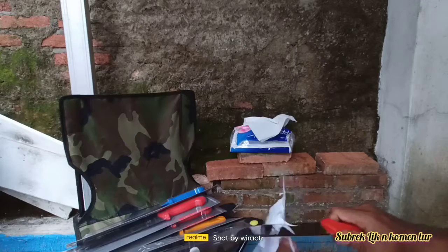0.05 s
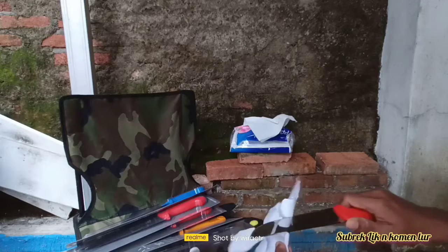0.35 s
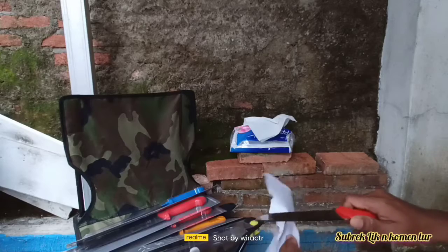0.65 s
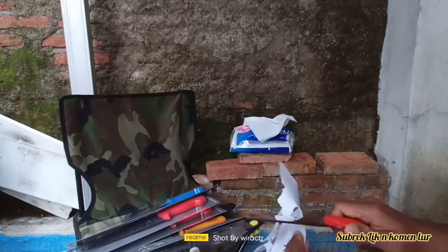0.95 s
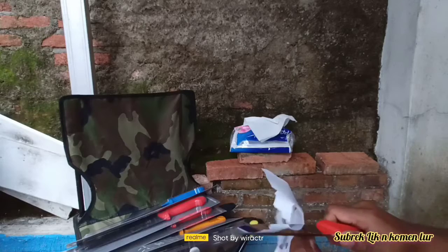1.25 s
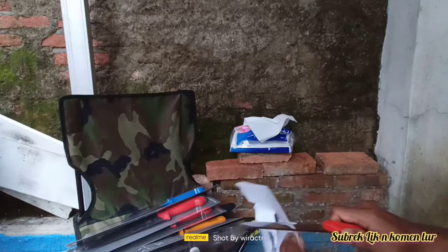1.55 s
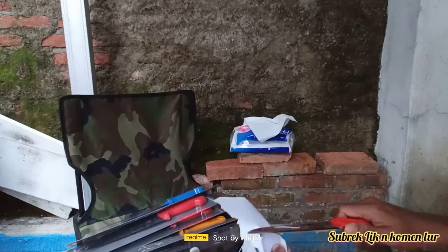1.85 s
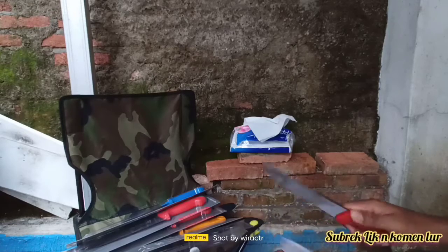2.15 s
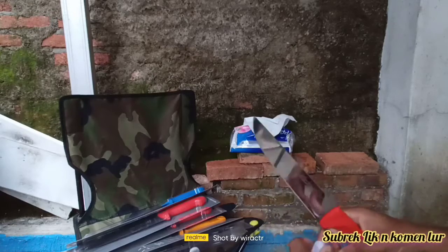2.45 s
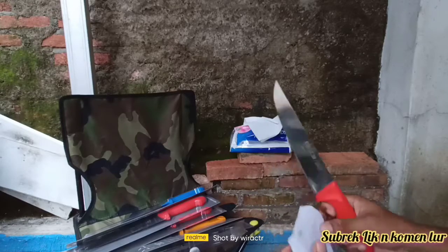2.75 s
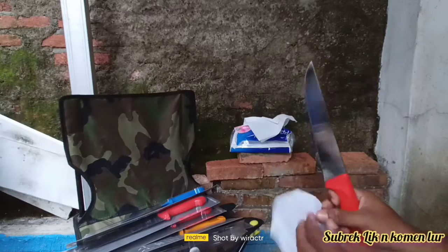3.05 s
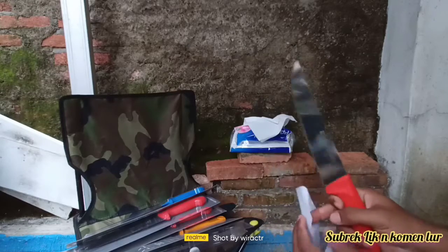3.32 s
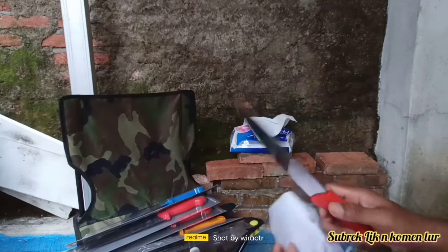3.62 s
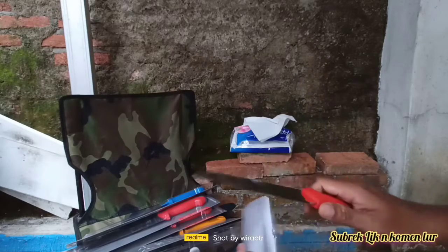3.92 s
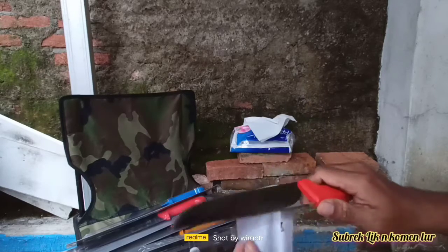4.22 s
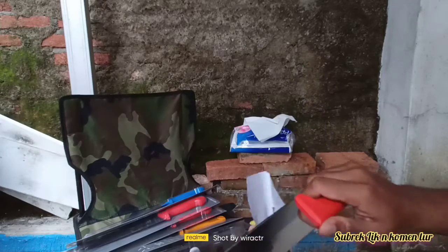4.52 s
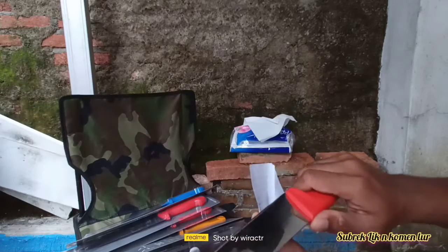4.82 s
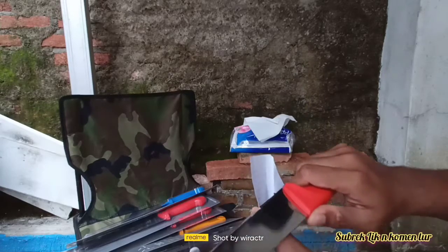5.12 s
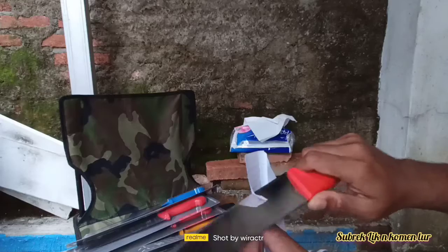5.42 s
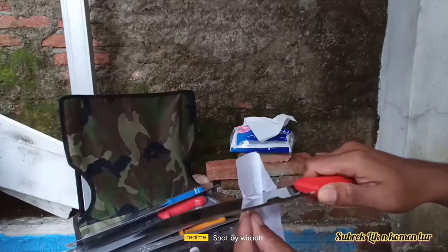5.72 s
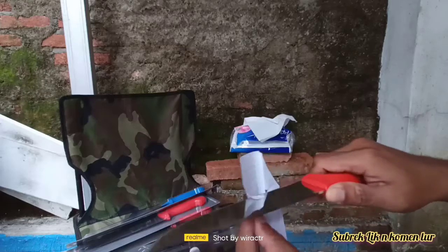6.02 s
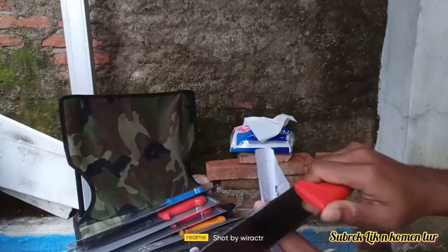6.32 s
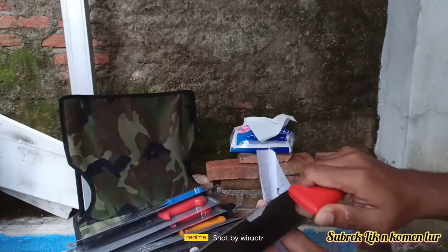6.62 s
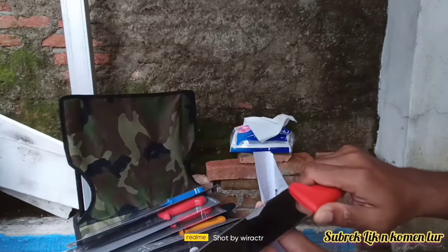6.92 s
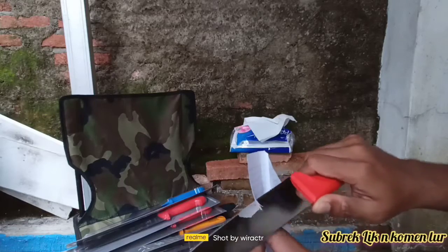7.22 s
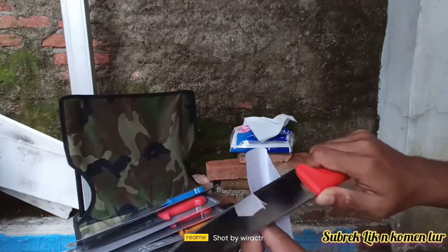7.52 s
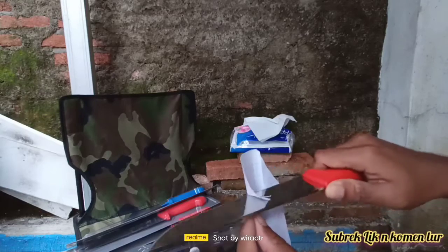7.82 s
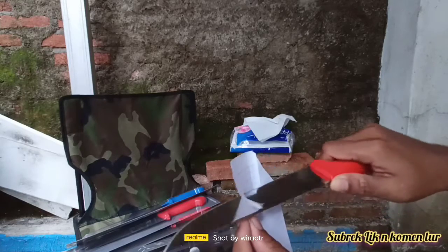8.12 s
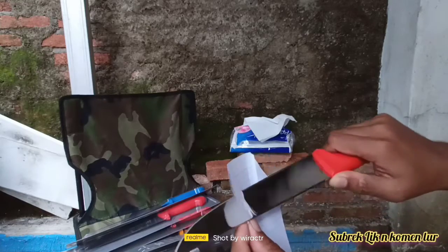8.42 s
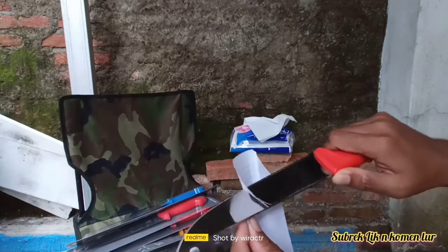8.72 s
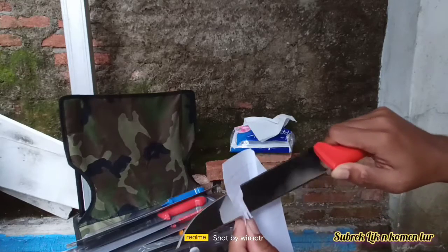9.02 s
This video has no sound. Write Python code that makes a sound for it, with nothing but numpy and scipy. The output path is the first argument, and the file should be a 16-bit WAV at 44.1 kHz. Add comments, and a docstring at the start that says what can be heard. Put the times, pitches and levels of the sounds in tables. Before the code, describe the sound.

In a quiet corner with a short echo from nearby walls, a knife rips twice through tissue paper at close range. Light rustles and crisp little crackles follow as fingers shift the sheet. Then come two runs of slower slicing strokes, thin, hissy and faintly ringing. A distant motorbike idles softly underneath, growing a little louder and speeding up near the end.

```python
"""Two quick cuts rip through a hand-held paper tissue, close by, in a quiet walled corner.
A sharp knife snaps the fibres, which hiss and shake the sheet. The tissue is picked up again with
small crinkles, then the blade is drawn through it in slow strokes that set paper and steel ringing.
Far off a motorbike idles and pulls away, its firings humming through the exhaust.
A noise suppressor holds the bass down, but lets that hum well up under the loud strokes."""
import sys
import numpy as np
from scipy import signal
from scipy.fft import rfft, irfft
from scipy.io import wavfile
from scipy.ndimage import uniform_filter1d

SR = 44100
rng = np.random.default_rng(int(sys.argv[2]) if len(sys.argv) > 2 else 0)


def store_wav(level_fs):
    """Save 16-bit WAV to argv[1]."""
    pcm = np.round(np.clip(np.atleast_2d(level_fs), -1, 1) * 32767)
    wavfile.write(sys.argv[1], SR, pcm.T.astype(np.int16))


N = 403515
TIME = np.arange(N) / SR
CUTOFF_HZ = 15700

# Levels in the tables are relative: the functions add their own gains.
# tone colour of still air: f/Hz, level/dB
AIR_COLOUR = [(18, -23.5), (30, -24), (75, 0.5), (148, 1), (202, -7.5), (341, -6.5), (467, -16), (591, -19),
              (656, -17.5), (1330, -28.5), (1640, -29), (2360, -31.5), (4910, -28), (9940, -50),
              (15500, -43)]
# faint tones: start/s, length/s, first f/Hz, last f/Hz, width/Hz, level/dB
TONE_SWELLS = [(0.548, 0.23, 1710, 1710, 170, -74.5), (1.838, 0.26, 710, 690, 52, -78),
               (3.822, 0.24, 175, 144, 14, -60), (4.552, 0.19, 4050, 4280, 300, -85),
               (5.837, 0.196, 4900, 5100, 330, -77), (7.552, 0.24, 147, 144.5, 18, -56)]
# the engine idles, then pulls away: t/s, firing rate/Hz, level/dB, boom/dB
ENGINE_RUN = [(0, 31.2, -65.5, -67), (1.1, 29, -62, -60.5), (1.6, 30, -60.5, -63), (2.1, 28, -65.5, -67.5),
              (2.6, 27.4, -66, -54.5), (3.25, 30.5, -62.5, -72), (3.6, 32.6, -62, -74),
              (3.95, 29, -60, -68), (5.0, 30, -71, -78), (5.55, 27.5, -61, -47.5), (5.85, 29.5, -49, -44),
              (6.14, 28.4, -59.5, -58), (6.45, 29, -57, -49.5), (7.15, 30, -61, -62),
              (7.6, 34, -58.5, -57.5), (7.92, 34, -55.5, -55), (8.28, 38.1, -52.5, -54),
              (9.15, 38.7, -53, -76)]
# tone colour of the exhaust pipe: f/Hz, level/dB
EXHAUST_COLOUR = [(28, -19.5), (45, -12.5), (60, 3), (76, 1.5), (95, -6.5), (115, -1), (150, -4.5),
                  (190, 1.5), (260, -6.5), (370, -5.5), (470, -14.5), (600, -16.5), (750, -26.5),
                  (1500, -30.5), (3500, -43)]
# the engine's 16th harmonic sings under load: t/s, level/dB
ENGINE_WHINE = [(7.9, -75), (8.2, -66.5), (8.55, -69.5), (8.84, -52.5), (8.93, -68)]
# fingers bump the handle: t/s, level/dB, f/Hz, t60/s (time to fade by 60 dB)
FINGER_BUMPS = [(0.326, -59, 370, 0.1), (1.789, -47, 143, 0.16), (3.1, -52, 377, 0.16),
                (3.211, -56, 366, 0.09), (3.238, -63, 250, 0.1), (3.566, -53.5, 384, 0.15),
                (6.466, -58, 343, 0.26)]
# tone colours of the fibres' hiss when rustled, slowly sliced and quickly cut: f/Hz, level/dB
RUSTLE_HISS = [(1200, -17), (2300, -24), (3300, -6), (5200, -1.5), (6200, -5), (7400, 1.5), (8300, -1.5),
               (9800, -10.5), (12000, -11), (14600, -4.5), (15500, -3.5)]
DRAW_HISS = [(1200, -18), (2200, -4), (3000, 1.5), (4200, 0), (4500, -2), (5200, 0), (6400, -2),
             (7700, 4.5), (8500, 0.5), (9800, -6), (12000, -6.5), (14000, -1.5), (15500, 0)]
CUT_HISS = [(1200, -48), (2200, -20), (3100, -5), (4200, -7.5), (4900, -3), (5600, -7), (7300, -1),
            (8100, -3), (8650, -6.5), (9600, -7.5), (11300, -11), (13000, -4.5), (14900, 1), (15600, -4.5)]
# tone colours of the "body", the whole sheet shaking, loose and taut: f/Hz, level/dB
LOOSE_BODY = [(35, -23), (70, 10.5), (130, 10.5), (220, 8), (380, 5.5), (550, 2), (800, 0), (1150, 0),
              (1500, 0), (1900, -1), (2600, -3), (3500, -3), (6000, -52)]
TAUT_BODY = [(35, -5), (70, -8), (130, 5.5), (250, 2), (450, -5), (680, -6), (1000, -0.5), (1250, -7.5),
             (1650, -2.5), (2000, -10.5), (2500, -11.5), (3300, -9), (6000, -23)]
# the tissue shifts in the hand: middle/s, half length/s, hiss/dB, body against hiss/dB
SHEET_SHIFTS = [(0.627, 0.11, -64, -9.5), (0.786, 0.018, -66.5, -9.5), (0.868, 0.033, -66, -11),
                (1.007, 0.078, -72, -11.5), (1.135, 0.0087, -71.5, -18), (1.183, 0.02, -65, -17),
                (1.305, 0.018, -67, -11), (1.86, 0.1, -77, -4), (2.254, 0.16, -72, -12.5),
                (2.437, 0.05, -76.5, -9), (2.698, 0.18, -70, -13), (3.075, 0.02, -87, -15),
                (3.194, 0.058, -52.5, -10), (3.614, 0.1, -52, -10.5), (3.822, 0.025, -68.5, -10),
                (3.931, 0.069, -65, -12), (4.146, 0.48, -77.5, -3.5), (4.227, 0.03, -73.5, -5),
                (4.394, 0.023, -60.5, -14), (4.533, 0.012, -71, -19), (5.86, 0.09, -73, -3.5),
                (6.02, 0.051, -71.5, -2.5), (6.515, 0.33, -81, -2.5)]
# creases snap: t/s, level/dB, body against level/dB, t60/s
CREASE_SNAPS = [(0.282, -25, -24, 0.048), (0.61, -39.5, -13, 0.086), (0.63, -49, -18, 0.065),
                (0.713, -47, -17, 0.094), (1.288, -43.5, -16, 0.16), (1.785, -35, -7, 0.053),
                (2.543, -48, -8.5, 0.075), (2.577, -47, -1.5, 0.12), (2.674, -56.5, 3.5, 0.064),
                (2.967, -59, -25, 0.077), (3.096, -40, -12, 0.087), (3.115, -45, -3, 0.02),
                (3.211, -33.5, -18.5, 0.057), (3.324, -46.5, -13, 0.13), (3.442, -58, -5.5, 0.059),
                (3.507, -52, 3.5, 0.077), (3.551, -39.5, -3.5, 0.05), (3.568, -39, -4, 0.06),
                (3.684, -34.5, -8, 0.077), (3.835, -45, -8, 0.087), (4.191, -48.5, -8, 0.08),
                (5.127, -54, -7, 0.12), (5.724, -34.5, -30.5, 0.071), (5.979, -44, -5.5, 0.11),
                (6.468, -58, -11, 0.06), (6.651, -57, -6.5, 0.067), (8.44, -37, -9, 0.18),
                (8.503, -35, -28, 0.06), (8.808, -38.5, -9.5, 0.13)]
# modes (natural notes) of the taut flap, the steel blade and the flapping sheet: f/Hz, width/Hz, level/dB
FLAP_MODES = [(886, 320, -6), (1690, 280, 4.5), (2150, 50, -28)]
BLADE_MODES = [(4000, 160, -14), (4100, 300, -5.5), (4850, 115, 0.5), (6090, 220, -11.5), (6960, 47, -13.5),
               (7500, 32, -13), (7900, 220, -16.5), (8200, 45, -5), (9400, 200, -9.5), (14400, 200, -8.5)]
FLUTTER_MODES = [(1135, 100, -4), (1920, 180, -4), (3470, 140, -11), (4170, 250, -5.5), (4900, 120, -18),
                 (5900, 130, -6), (6420, 140, -6), (7700, 260, -11), (7920, 200, -0.5), (9460, 460, -12)]
# quick strokes, the first two joined into one cut:
# start/s, length/s, attack/s, hiss/dB, swell along the stroke/dB, body against hiss/dB, rasp/dB
CUT_STROKES = [(0.0, 0.095, 0.0013, -47.5, -3.5, -13.5, -3.5), (0.08, 0.27, 0.085, -38.5, -1, -13, -14.5),
               (1.335, 0.44, 0.16, -42, 0, -13.5, 3)]
# slow strokes: the same columns, then first rasp f/Hz, treble bite/dB, flap tuning/ratio, ringing/dB
DRAW_STROKES = [(5.125, 0.25, 0.042, -70.5, 6.5, -6.5, -33, 7700, 3, 1.12, 6),
                (5.33, 0.3, 0.11, -43.5, 0, -9.5, 1.5, 7500, 3.5, 0.96, 0.5),
                (5.63, 0.14, 0.051, -57, 4, -9, -29, 4034, 3.5, 0.87, -8),
                (6.9, 0.66, 0.037, -71.5, 12, -9, 0.5, 4297, 3.5, 0.96, -2),
                (7.51, 0.3, 0.082, -53, -1, -6, -22.5, 3795, 1, 0.93, -4),
                (7.795, 0.36, 0.064, -48.5, -3, -8, -10, 7900, 2, 0.96, 1),
                (8.15, 0.23, 0.043, -49.5, 0, -11.5, -15, 4100, -7, 0.951, -1.5),
                (8.43, 0.36, 0.012, -68, -4, 1.5, -14, 4100, -5, 1.05, -6),
                (8.87, 0.31, 0.11, -48.5, -0.5, -12.5, -18, 4263, -7, 0.89, -0.5)]


def from_db(db):
    """Turn decibels into a gain."""
    return 10 ** (np.asarray(db) / 20)


def rms_one(x):
    """Scale a signal to an average power of 1."""
    return x / np.sqrt(np.mean(x ** 2) + 1e-20)


def in_time(rows):
    """Join a table's timed points with lines, giving each column at every sample."""
    times, *columns = np.transpose(rows)
    return [np.interp(TIME, times, column) for column in columns]


def during(rows):
    """1 from a table's first time to its last, 0 outside, with soft edges."""
    return uniform_filter1d(1.0 * ((TIME >= rows[0][0]) & (TIME <= rows[-1][0])), size=300)


def drift(rate_hz):
    """A smooth random wobble, about 1 in size."""
    pole = np.exp(-40 * np.pi * rate_hz / SR)
    noise = rng.standard_normal(N // 20 + 2002)  # one value per 20 samples
    slow = signal.lfilter([1], [1, -2 * pole, pole * pole], noise)[2000:]
    return np.interp(np.arange(N) / 20, np.arange(len(slow)), rms_one(slow))


def colour(x, spectrum, size=8192):
    """Give a sound a tone colour; white noise keeps its power."""
    hz, db = np.transpose(spectrum)
    bins_hz = np.fft.rfftfreq(size, 1 / SR)
    curve_db = np.interp(np.log(bins_hz + 1), np.log(hz), db)
    gain = rms_one(from_db(curve_db) * (bins_hz < CUTOFF_HZ + 1000) + 1e-4)
    # minimum phase: the filter rings only after a click, never before it
    cepstrum = irfft(np.log(gain))[:size // 2]
    cepstrum[1:] *= 2
    return signal.oaconvolve(x, irfft(np.exp(rfft(cepstrum, size))))[:N]


def resonator(hz, width_hz):
    """Filter coefficients that ring at one pitch, with a gain of 1 there."""
    r = np.exp(-np.pi * width_hz / SR)
    return (1 - r * r) / 2 * np.array([1, 0, -1]), [1, -2 * r * np.cos(2 * np.pi * hz / SR), r * r]


def glide(x, hz, width_hz, size=256):
    """Pass a sound through a resonator whose pitch moves."""
    out, state = np.zeros(N), np.zeros(2)
    for i in range(0, N, size):
        out[i:i + size], state = signal.lfilter(*resonator(hz[i], width_hz), x[i:i + size], zi=state)
    return out


def shelf(x, hz, db):
    """Raise or lower everything above hz."""
    low = np.tile(signal.butter(2, hz, "low", fs=SR, output="sos"), (2, 1))
    high = np.tile(signal.butter(2, hz, "high", fs=SR, output="sos"), (2, 1))
    return signal.sosfilt(low, x) + from_db(db) * signal.sosfilt(high, x)


def still_air(level_db=-71.5):
    """The air is a soft, steady, low noise."""
    return from_db(level_db) * colour(rng.standard_normal(N), AIR_COLOUR)


def faint_tones():
    """Unsteady tones swell and fade, most sliding a little in pitch."""
    out = np.zeros(N)
    for start, length, first_hz, last_hz, width_hz, db in TONE_SWELLS:
        progress = np.clip((TIME - start) / length, 0, 1)
        phase = 2 * np.pi * np.cumsum(first_hz + (last_hz - first_hz) * progress) / SR
        tone = drift(width_hz / 2) * np.cos(phase) + drift(width_hz / 2) * np.sin(phase)
        out += from_db(db) * np.sin(np.pi * progress) * tone
    return out


def motorbike(harmonics=26, waver_db=3.5, idle_hz=28.74, boom_hz=122, boom_width_hz=13.8):
    """Harmonics of the firing rate leave the exhaust and waver on their long way, over a rumble."""
    firing_hz, level_db, boom_db = in_time(ENGINE_RUN)
    phase = 2 * np.pi * np.cumsum(firing_hz * (1 + 0.00446 * drift(8.1))) / SR
    boom = from_db(boom_db + 1.1 * drift(16))
    whine = during(ENGINE_WHINE) * from_db(in_time(ENGINE_WHINE)[0] + 3.78 * drift(13.7))
    rumble = from_db(level_db - 6.5) * colour(rng.standard_normal(N), EXHAUST_COLOUR)
    pipe_hz, pipe_db = np.transpose(EXHAUST_COLOUR)
    hum, tones = np.zeros((2, N))
    for k in range(1, harmonics + 1):
        hz = k * firing_hz
        wave = np.sqrt(2) * np.sin(k * phase + 2 * np.pi * rng.random())
        db = np.interp(np.log(hz), np.log(pipe_hz), pipe_db) + waver_db * drift(8)
        hum += from_db(level_db + db - 11.5) * wave
        near_boom = np.exp(-((hz - boom_hz) / boom_width_hz) ** 2)
        tones += wave * (boom * near_boom + whine * (k == 16))
    treble_db = -1.5 + 1.256 * (firing_hz - idle_hz)  # faster is brighter
    return shelf(rumble + hum, 364, treble_db) + tones


def walls(x, t60=0.18, echo_db=-8.5):
    """Nearby walls send back a short blur of echoes."""
    age = TIME[:SR // 3]
    tail = rng.standard_normal(len(age)) * from_db(-60 * age / t60) * (age > 0.004)
    return x + from_db(echo_db) * signal.oaconvolve(x, tail / np.linalg.norm(tail))[:N]


def bumps(width_hz=130):
    """Skin meets the handle in a dull rub that dies quickly."""
    out = np.zeros(N)
    age = TIME[:SR // 2]
    for t, db, hz, t60 in FINGER_BUMPS:
        start = round(t * SR)
        push = rng.standard_normal(len(age)) * from_db(db - 60 * age / t60)
        thud = signal.lfilter(*resonator(hz, width_hz), push)
        out[start:start + len(age)] += thud * np.sqrt(SR / np.pi / width_hz)
    return signal.sosfilt(signal.butter(2, 900, fs=SR, output="sos"), out + 1e-18)


def fibres(per_s, rub_db, clump_db, clump_hz):
    """Single fibres snap at random, in clumps, over the smooth noise of rubbing."""
    snaps = (rng.random(N) < per_s / SR) * rng.choice([-1, 1], N)
    strength = from_db(5.7 * np.minimum(rng.exponential(1, N), 4))
    force = rms_one(snaps * strength) + from_db(rub_db) * rng.standard_normal(N)
    return rms_one(force * from_db(clump_db * drift(clump_hz)))


def paper(hiss_gain, body_gain, force, hiss_colour, body_colour):
    """Snapping fibres hiss directly, and each also pushes the whole sheet one way or the other."""
    pushes = force * rng.choice([-1, 1], N)
    return colour(force * hiss_gain, hiss_colour) + colour(pushes * body_gain, body_colour) + 1e-18


def rustles():
    """Fingers shift the soft sheet in smooth, grainy swells."""
    force = fibres(per_s=1800, rub_db=3, clump_db=2, clump_hz=10.3)
    hiss, body = from_db(-95), 0  # a held sheet is never quite still
    for middle, half_length, db, body_db in SHEET_SHIFTS:
        swell = from_db(db) * np.exp(-np.minimum(((TIME - middle) / half_length) ** 2, 20))
        hiss = hiss + swell
        body = body + swell * from_db(body_db + 4)
    return from_db(-2) * paper(hiss, body, force, RUSTLE_HISS, LOOSE_BODY)


def crinkles(crack_s=0.0042, crisp_t60=0.059, rise_share=0.072):
    """A stiff crease gives way with a short crack; a limp one yields in a longer spray of fibres."""
    hiss, body = np.zeros((2, N))
    for t, db, body_db, t60 in CREASE_SNAPS:
        start = round(t * SR)
        age = TIME[:min(SR // 2, N - start)]
        crack = min(1, crisp_t60 / t60) ** 2 * np.exp(-(age / crack_s) ** 2)
        spray = from_db(-60 * age / t60) * (1 - np.exp(-age / (rise_share * t60)))
        burst = from_db(db) * (crack + spray)
        hiss[start:start + len(age)] += burst
        body[start:start + len(age)] += burst * from_db(body_db)
    snap = colour(rng.standard_normal(N) * hiss, RUSTLE_HISS)
    shake = colour(rng.standard_normal(N) * body, LOOSE_BODY)
    return from_db(-11) * snap + from_db(-5.5) * shake


def strokes(rows, release_db_per_s):
    """Strokes rise, run and die away. Gives gain, progress (0-1) and the columns after swell."""
    start, length, attack, db, swell_db, *columns = np.transpose(rows)[:, :, None]
    grid = TIME[::32]
    age = grid - start
    progress = np.clip(age / length, 0, 1)
    rise = np.clip(age / attack, 0, 1) ** 1.1  # the edge bites gently at first
    release_db = release_db_per_s * np.clip(age - length, 0, 1)
    gains = rise * from_db(db + swell_db * progress - release_db)
    gain = gains.sum(axis=0)
    # the loudest stroke has the most say in each setting
    controls = [(gains * column).sum(axis=0) / (gain + 1e-30) for column in [progress] + columns]
    return [np.interp(TIME, grid, control) for control in [gain] + controls]


def flap(x, tuning):
    """The taut flap of paper rings in a few modes, tuned by its length."""
    return sum(from_db(db) * glide(x, hz * tuning, width) for hz, width, db in FLAP_MODES)


def rasp_pitch(progress, first_hz, hold_share, fall_share, low_hz=3270):
    """The rasp holds its pitch, then sinks towards low_hz as the flap lengthens."""
    return first_hz + (low_hz - first_hz) * np.clip((progress - hold_share) / fall_share, 0, 1)


def ringing(x, modes, shift_db, shift_hz):
    """The moving point of contact favours now one mode, now another."""
    out = np.zeros(N)
    for hz, width, db in modes:
        gain = from_db(db + shift_db * np.tanh(drift(shift_hz)))
        out += gain * signal.lfilter(*resonator(hz, width), x)
    return out


def slow_draws(flap_sag=0.039, rasp_fade_db=12.5, bite_fade_db=6):
    """The blade slides through taut tissue; the fine friction sets flap and steel ringing."""
    force = fibres(per_s=6000, rub_db=2, clump_db=1, clump_hz=59)
    controls = strokes(DRAW_STROKES, release_db_per_s=425)
    gain, progress, body_db, rasp_db, first_hz, bite_db, tuning, ring_db = controls
    along = progress - 0.5  # as the flap lengthens, its modes sink and the bite dulls
    rub = paper(gain, gain * from_db(body_db + 1.5), force, DRAW_HISS, TAUT_BODY)
    flap_ring = flap(rub, tuning - flap_sag * along)
    steel_ring = ringing(rub, BLADE_MODES, shift_db=11.5, shift_hz=10.04)
    rings = from_db(ring_db) * (flap_ring + steel_ring)
    rasp_hz = rasp_pitch(progress, first_hz, hold_share=0.538, fall_share=0.61)
    rasp = from_db(rasp_db - rasp_fade_db * along) * glide(rub, rasp_hz, width_hz=757)
    return from_db(-2.5) * shelf(rub + rings + rasp, 7000, bite_db - bite_fade_db * along)


def quick_cuts(loosening_db=3.5, ring_fade_db=42):
    """The edge rips the sheet, which rings while still taut; its loose flap rasps and flutters."""
    force = fibres(per_s=6000, rub_db=4, clump_db=1, clump_hz=30)
    gain, progress, body_db, rasp_db = strokes(CUT_STROKES, release_db_per_s=483)
    body_gain = gain * from_db(body_db + 4 + loosening_db * (progress - 0.5))
    rip = paper(gain, body_gain, force, CUT_HISS, LOOSE_BODY)
    taut_ring = from_db(-1 - ring_fade_db * progress) * flap(rip, tuning=np.full(N, 1.1))
    rasp_hz = rasp_pitch(progress, first_hz=7700, hold_share=0.47, fall_share=0.4)
    rasp = from_db(rasp_db + 2) * glide(rip, rasp_hz, width_hz=3230)
    flutter = ringing(rip, FLUTTER_MODES, shift_db=8.5, shift_hz=28)
    return from_db(-4) * (rip + taut_ring + rasp + flutter)


def noise_suppressor(x, split_hz=600, depth_db=10.5, shut_db=-68, range_db=19.5, release_db_per_s=130):
    """The bass is held down while the treble is quiet, so the hum wells up under loud strokes."""
    treble = signal.sosfilt(signal.butter(2, split_hz, "high", fs=SR, output="sos"), x)
    level_db = 10 * np.log10(np.abs(uniform_filter1d(treble ** 2, size=1024)) + 1e-14)
    fall_db = release_db_per_s * TIME
    held_db = np.maximum.accumulate(level_db + fall_db) - fall_db  # jumps up, sinks steadily
    cut_db = depth_db * (1 - np.clip((held_db - shut_db) / range_db, 0, 1))
    return from_db(-cut_db) * shelf(x, split_hz, cut_db)


def scene():
    """Paper and blade close by, the motorbike and the air behind; the same in both ears."""
    near = walls(quick_cuts() + slow_draws() + rustles() + crinkles() + bumps())
    air = still_air()
    mono = noise_suppressor(near + motorbike()) + faint_tones() + air
    return np.tile(mono, (2, 1))


def record(dry):
    """A steep filter removes the highest treble."""
    return signal.sosfilt(signal.ellip(12, 0.1, 70, CUTOFF_HZ, fs=SR, output="sos"), dry)


dry = scene()
out = record(dry)
store_wav(out)
```